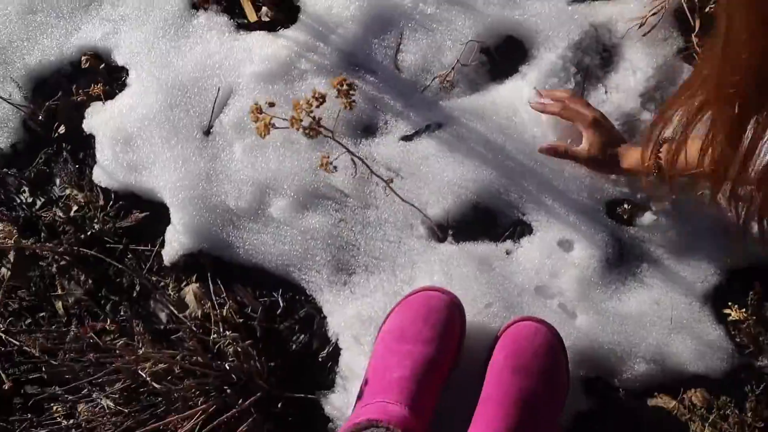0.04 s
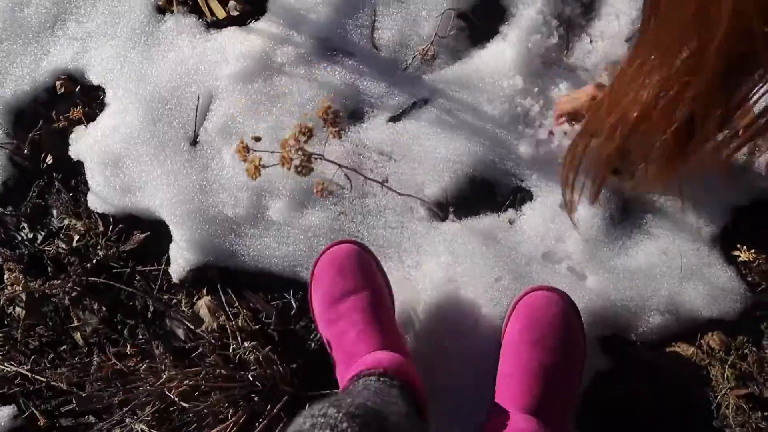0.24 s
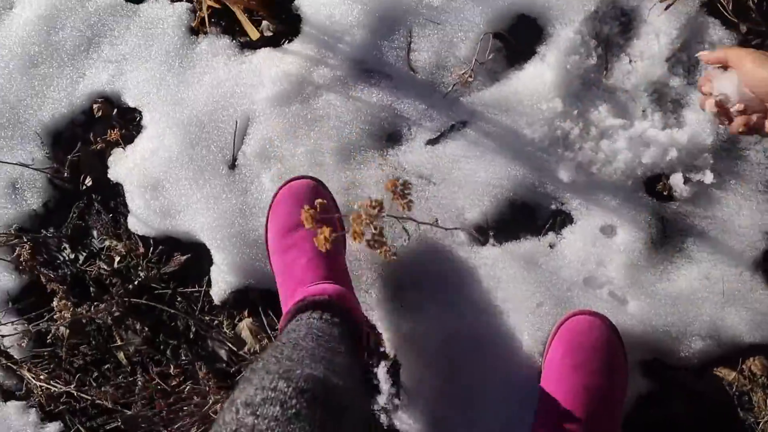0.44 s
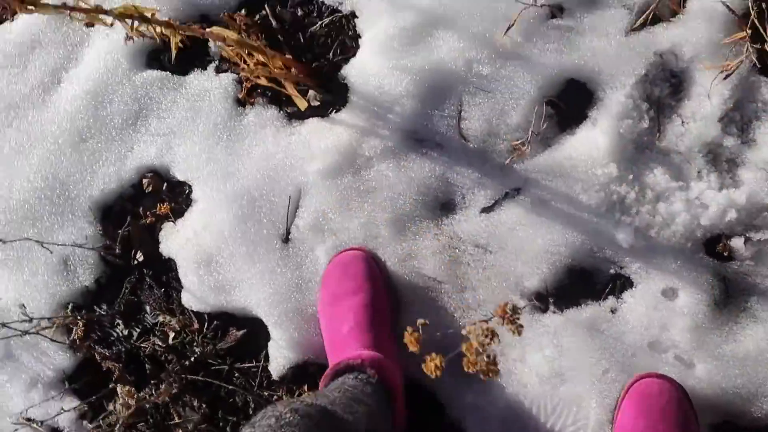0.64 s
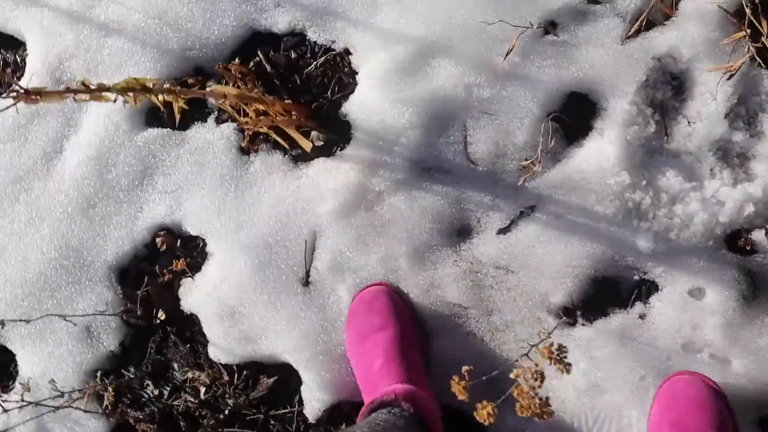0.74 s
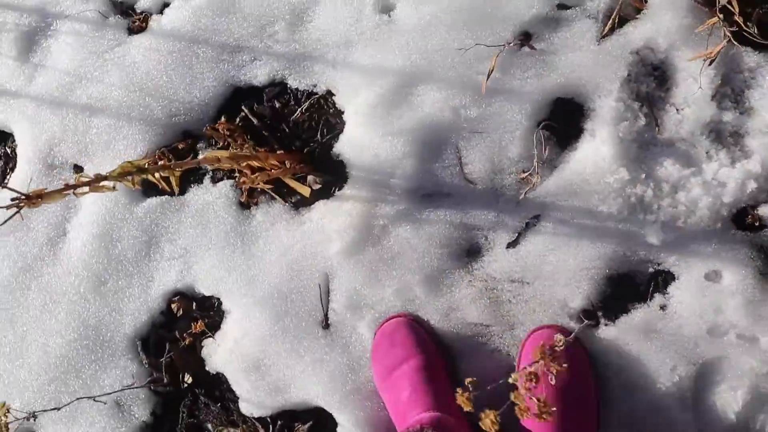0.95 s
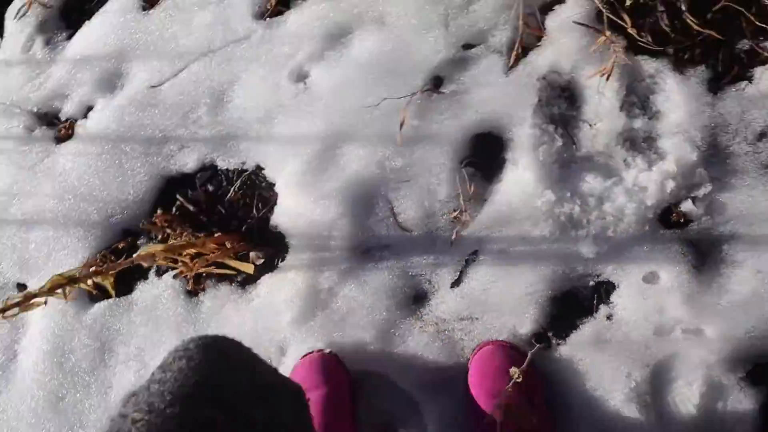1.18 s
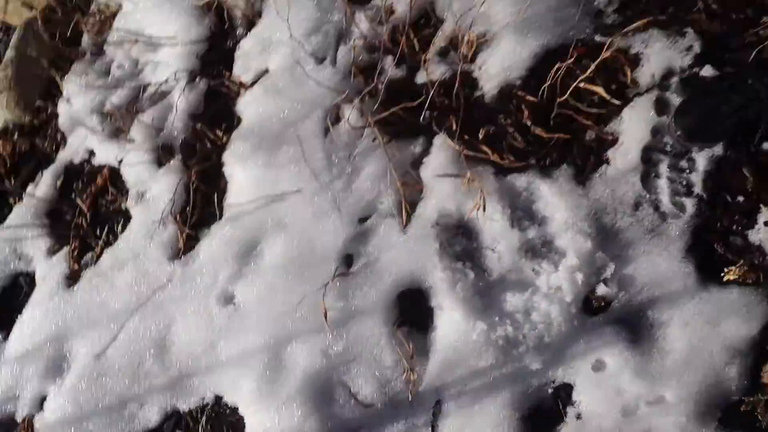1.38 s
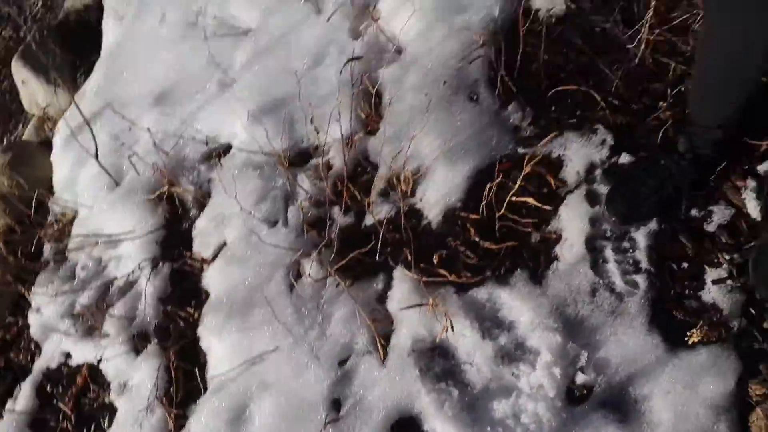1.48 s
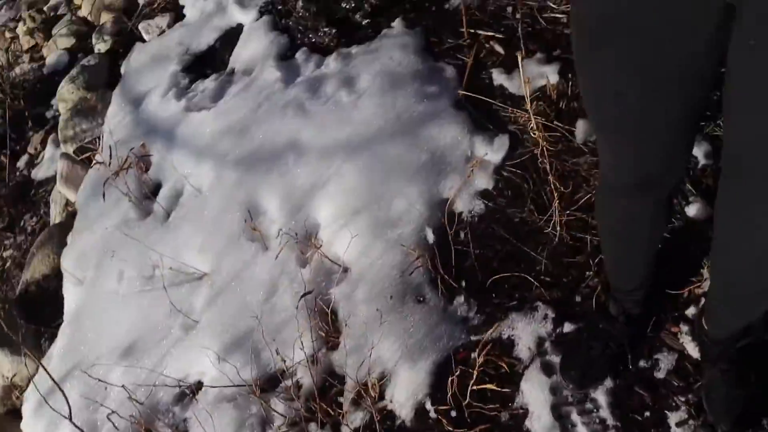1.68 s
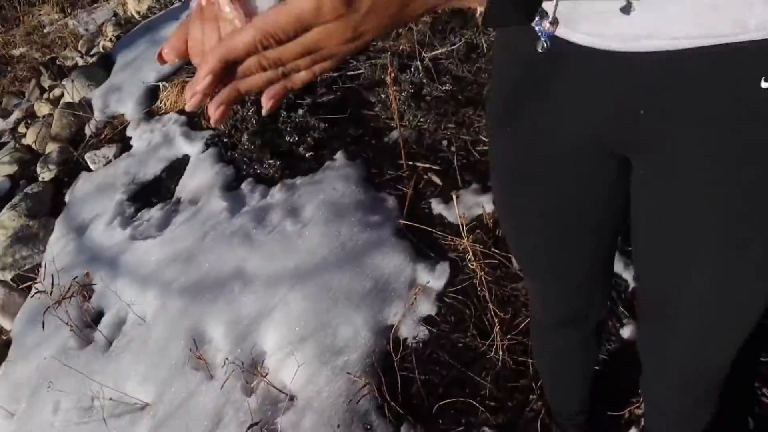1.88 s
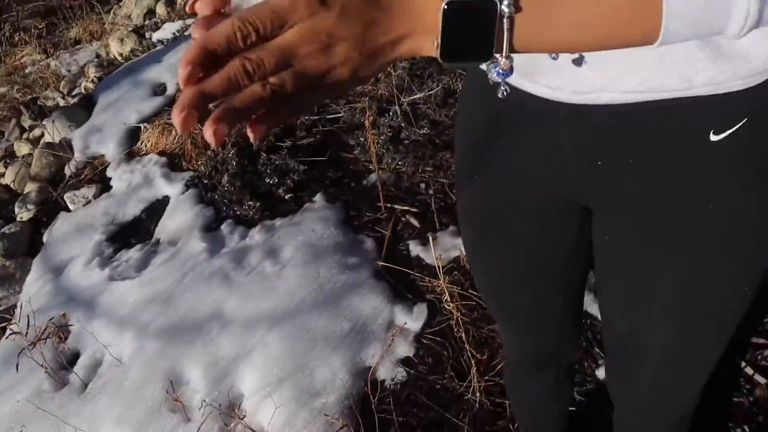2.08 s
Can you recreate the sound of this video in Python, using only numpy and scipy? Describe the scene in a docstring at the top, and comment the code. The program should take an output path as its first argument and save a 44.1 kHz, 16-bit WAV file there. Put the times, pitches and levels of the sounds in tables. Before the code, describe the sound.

Old crusty snow crunching in short bursts underfoot and by hand, with low wind rumble.

```python
"""Old crusty snow is scooped and trodden, close to a hand-held camera outdoors.
Each push crushes a swarm of ice grains: a hollow crunch and ringing chips from the crust,
a fizz from loose crystals. Pieces of crust snap, single crystals tick and a few sprinkle down.
Underneath, gusts buffet the microphone over a low outdoor rumble."""
import sys
import numpy as np
from scipy import signal
from scipy.fft import rfft, irfft
from scipy.io import wavfile

SR = 44100
rng = np.random.default_rng(int(sys.argv[2]) if len(sys.argv) > 2 else 0)


def inscribe(sig):
    """Save sig as 16-bit PCM at rate SR to the path in sys.argv[1].

    A 1-D sig is mono; a 2-D sig holds one channel per row.
    Samples are clipped to [-1, 1] before scaling.
    """
    pcm = np.round(np.clip(np.atleast_2d(sig).T, -1, 1) * 32767)
    wavfile.write(sys.argv[1], SR, pcm.astype(np.int16))


N = 93624
T, HZ = np.arange(N) / SR, np.fft.rfftfreq(N, 1 / SR) + 1e-3
SNOW_SHAPE, GUST_SHAPE = 1.46, 1.42  # swells: 1 = pointed, 2 = bell-shaped


def amp(db):
    """Decibels to gain."""
    return 10 ** (np.asarray(db) / 20)


def unit_rms(x):
    """Scales to rms 1."""
    return x / np.sqrt(np.mean(abs(x) ** 2) + 1e-20)


def curve(points, hz):
    """Reads a table on a log-frequency axis."""
    at, value = np.transpose(points)
    return np.interp(np.log(hz), np.log(at), value)


def colour(points, shift=1):
    """An EQ curve as gain per frequency, shifted in pitch, at unit power."""
    return unit_rms(amp(curve(points, HZ / shift)))


def resonance(hz, q):
    """A damped resonance at unit power."""
    return unit_rms(1 / (1 + 1j * q * (HZ / hz - hz / HZ)))


def crystal_ring(hz, q, top_hz=12600):
    """The ring of a small piece of ice, dulled at the very top."""
    return unit_rms(resonance(hz, q) / np.sqrt(1 + (HZ / top_hz) ** 20))


def swell(peak, rise, fall, shape):
    """An envelope that builds to a peak and dies away."""
    distance = abs(T - peak) / np.where(T < peak, rise, fall)
    return np.exp(-distance ** shape / np.sqrt(2))


def grains(per_s, scatter_db):
    """Random fractures as clicks: many small, a few large."""
    sizes = amp(scatter_db * np.minimum(rng.exponential(1, N), 4))
    return unit_rms(sizes * rng.choice([-1, 1], N) * (rng.random(N) < per_s / SR))


# How far the microphone pair pulls off-centre sounds apart (frequency [Hz], side over mid [dB])
STEREO_WIDTH = [(100, -66.5), (300, -41), (850, -12), (1700, -1.5), (4000, 2), (9000, 11), (14000, 10)]

def mic_pair(clicks, tone, side, spread):
    """Colours the clicks and gives each a direction scattered around side (- left, + right)."""
    width, mid = amp(curve(STEREO_WIDTH, HZ)), rfft(clicks)
    directions = side + spread * rng.standard_normal(N)
    apart = 1j * width * rfft(clicks * directions)
    tone = tone / np.sqrt(1 + width ** 2 * (side ** 2 + spread ** 2))  # width adds no power
    return irfft(np.array([mid - apart, mid + apart]) * tone, N)


# Tone of the outdoor bed (frequency [Hz], level [dB])
RUMBLE_EQ = [(20, -25), (50, -9), (90, 1), (200, -3), (265, -0.5), (305, 4), (370, -4.5), (650, -3.5),
             (1000, -14), (2000, -15.5), (5000, -20), (12000, -22.5), (15000, -35)]

def rumble(db=-41.5, width_db=4):
    """Steady distant outdoor noise from all sides."""
    return amp(db) * mic_pair(rng.standard_normal(N), colour(RUMBLE_EQ), side=0, spread=amp(width_db))


# Tone of a gust centred on GUST_EQ_HZ (frequency [Hz], level [dB])
GUST_EQ, GUST_EQ_HZ = [(15, -53), (35, -12), (65, -4), (115, -1.5), (180, -7), (280, -15.5), (450, -27.5),
                       (3000, -84)], 110
# Wind buffets (peak time [s], rise [s], fall [s], level [dB], centre [Hz], unevenness [0-1])
GUST_CUES = [(.015, 0.013, 0.025, -23.5, 95, 0.7), (0.071, 0.015, 0.018, -19.5, 86, 0.7),
             (.165, 0.045, 0.036, -24, 118, 0.82), (0.246, 0.046, 0.036, -18, 99.4, 0.54),
             (.34, 0.025, 0.074, -36, 126, 0.1), (.58, 0.072, .06, -43.5, 77, .02),
             (1.006, 0.056, 0.029, -30.5, 128, 0.07), (1.122, 0.0036, 0.01, -35, 131, 0.08),
             (1.86, 0.055, 0.026, -39.5, 93, 0.14), (1.955, 0.012, 0.014, -24.5, 191, 0.4),
             (2.02, 0.048, 0.026, -34.5, 127, 0.23), (2.073, 0.019, 0.017, -27.5, 161, 0.32),
             (2.118, 0.0053, 0.038, -22, 152, 0.06)]

def gust(peak, rise, fall, db, hz, uneven, small_eddy_hz=370, lean_db=1):
    """Large eddies push on both microphone ports alike, small ones differently."""
    both, apart = rfft(rng.standard_normal((2, N))) * colour(GUST_EQ, hz / GUST_EQ_HZ)
    apart = apart * uneven * np.minimum(HZ / small_eddy_hz, 1)
    lean = amp(lean_db * uneven * np.array([[-1], [1]]))  # uneven gusts press harder on the right
    eddies = irfft(np.array([both - apart, both + apart]), N) * lean
    force = swell(peak, rise, fall, GUST_SHAPE)
    return amp(db) * unit_rms(eddies * force) * np.sqrt(np.mean(force ** 2))


# Sprinkles of ice (peak time [s], rise [s], fall [s], level [dB], side [0 centre, + right])
SPRINKLE_CUES = [(.435, .05, 0.04, -45.5, 8.7), (.775, 0.059, 0.031, -45, 7.8),
                 (0.973, 0.011, 0.013, -33, 0.78)]

def sprinkle(peak, rise, fall, db, side):
    """Sparse loose crystals land on the crust with tiny, high ticks."""
    landings = swell(peak, rise, fall, SNOW_SHAPE) * grains(per_s=2400, scatter_db=1.5)
    return amp(db) * mic_pair(landings, crystal_ring(hz=11100, q=3.5), side, spread=0.67)


# Single crystals and stalks breaking (time [s], level [dB], pitch [Hz])
TICK_CUES = [(.1197, -35, 3000), (.1402, -16, 11500), (.4904, -38, 8870), (.7139, -32, 7000),
             (.7405, -20, 9200), (1.1254, -19, 6060), (1.2771, -21.5, 2880), (1.2796, -15.5, 5970),
             (1.519, -27, 3000), (1.6143, -24, 11600), (1.8787, -17.5, 11100), (1.996, -37.5, 6060)]

def tick(start, db, hz, decay_s=0.00078):
    """One brittle break with a very short rattle."""
    burst = (T >= start) * np.exp(-abs(T - start) / decay_s) * rng.standard_normal(N)
    gain = amp(db) * np.sqrt(decay_s * SR / N / 2)
    return gain * mic_pair(unit_rms(burst), crystal_ring(hz, q=1.5), side=0.92, spread=0.72)


# Weight and bite laid over a snap's ring (frequency [Hz], level [dB])
SNAP_EQ = [(300, 15.5), (700, 5.5), (2800, -3.5), (7000, 8), (14000, -17)]
# Pieces of crust snapping (time [s], length [s], level [dB], pitch [Hz])
SNAP_CUES = [(.04, 0.028, -35, 2400), (0.0587, 0.0033, -28, 1040), (0.366, 0.0047, -40.5, 1140),
             (0.387, 0.0021, -38, 1080), (0.486, 0.0024, -33.5, 1130), (.532, 0.0015, -32.5, 1220),
             (.592, 0.0014, -21.5, 790), (0.614, 0.004, -26.5, 855), (.6145, 0.0044, -32, 2200),
             (0.712, .0047, -29, 1030), (0.737, 0.0051, -30, 895), (1.279, 0.005, -40.5, 2820),
             (1.553, 0.0055, -31, 1360), (1.736, 0.0038, -36.5, 1680)]

def snap(start, length, db, hz):
    """A quick run of fractures knocks a hollow piece of crust, which rings briefly."""
    envelope = (T >= start) * np.exp(-((T - start) / length) ** 2 / 2)
    fractures = envelope * grains(per_s=4000, scatter_db=2.5)
    body = resonance(hz, q=3.5) * colour(SNAP_EQ)
    gain = amp(db) * np.sqrt(length * SR / N)
    return gain * unit_rms(mic_pair(fractures, body, side=0.39, spread=0.19))


def chips(peak, rise, fall, crunch_hz, count=26, scatter_octaves=0.614, decay_cycles=2.2):
    """Larger chips of crust break off during a push, each ringing a few cycles at its own pitch."""
    when, pitch, size = rng.standard_normal((count, 3)).T
    start = peak + np.clip(when, -1.6, 1.6) * np.where(when < 0, rise, fall)
    ring_hz = np.clip(crunch_hz * 1.304 * 2 ** (scatter_octaves * pitch), 400, 9000)
    cycles = ring_hz[:, None] * T[:512]
    gain = amp(np.clip(size, -2, 1.5) - 2 * when ** 2)  # loudest near the peak of the push
    rings = gain[:, None] * np.sin(2 * np.pi * cycles) * np.exp(-cycles / decay_cycles)
    at = np.round(abs(start) * SR).astype(int)[:, None] + np.arange(cycles.shape[1])
    return np.bincount(at.ravel(), rings.ravel(), N)[:N]


# Hollow body of a crunch centred on CRUNCH_EQ_HZ (frequency [Hz], level [dB])
CRUNCH_EQ, CRUNCH_EQ_HZ = [(120, -2), (300, -4), (600, 1), (1400, -2), (2200, -2.5), (3500, -5.5),
                           (6000, -5), (10000, -24), (14000, -50)], 1000
# Bright fizz of loose crystals (frequency [Hz], level [dB])
FIZZ_EQ = [(400, -41), (1500, -18), (3000, -4), (5000, -3), (7500, 1.5), (10500, 4.5), (12200, 3.5),
           (13500, -11), (15500, -49)]
# Pushes into the snow (peak time [s], rise [s], fall [s], crunch level [dB], crunch centre [Hz],
# fizz level [dB], side [-1 left to 1 right], spread [0-1])
PUSH_CUES = [(.01, 0.05, 0.038, -36.5, 2070, -36.5, 1, 0.6), (0.059, 0.014, .014, -28.5, 1580, -43, 1, 0.5),
             (.135, 0.093, 0.033, -46, 1480, -35.5, .1, 0.58),
             (0.172, .009, .013, -38.5, 1850, -48, 0.65, 0.5),
             (0.239, 0.053, 0.058, -45, 1640, -29.5, 0.039, .55),
             (0.438, 0.099, 0.13, -50, 1180, -73, 0.59, 0.4),
             (0.534, 0.0092, 0.0073, -63, 1200, -38, 1, 0.7),
             (.612, 0.022, 0.0072, -35, 1170, -30.5, 0.016, 0.46),
             (.67, .045, .026, -32.5, 1113, -32.5, -0.38, 0.57),
             (0.744, 0.023, 0.064, -41, 1440, -70, 0.82, 0.77),
             (1.062, 0.012, .028, -20.5, 1360, -25.5, 0.56, 0.44),
             (1.15, 0.016, 0.065, -36, 1180, -36.5, -0.26, 0.48),
             (1.42, 0.046, .023, -38, 1050, -37, 0.087, 0.54),
             (1.47, .019, 0.025, -37.5, 1040, -42.5, 0.28, 0.53),
             (1.556, 0.0035, 0.02, -37, 1290, -54, -0.36, 0.3),
             (1.585, 0.053, 0.0061, -40.5, 1430, -38, 0.04, 0.18),
             (1.633, 0.029, 0.024, -37, 1190, -38.5, 0.044, 0.54),
             (1.658, .003, 0.0068, -46, 1400, -37, 0, 0),
             (1.677, 0.0076, 0.038, -45.5, 1410, -34.5, .2, 0.3),
             (1.771, 0.037, 0.052, -40, 1680, -33, 0, 0.42),
             (1.86, 0.019, .025, -34.5, 1070, -36, -0.74, 0.38),
             (1.916, 0.023, 0.032, -36, 790, -48, 0.71, 0.57)]

def push(peak, rise, fall, crunch_db, hz, fizz_db, side, spread, chip_db=2, clump_db=3, clump_s=0.012):
    """Crust crumbles in coarse grains and chips while loose crystals spill in fizzing clumps."""
    force = swell(peak, rise, fall, SNOW_SHAPE)
    coarse = force * grains(per_s=4500, scatter_db=2)
    crunch = mic_pair(coarse, colour(CRUNCH_EQ, hz / CRUNCH_EQ_HZ), side, spread)
    clump_sizes = np.clip(rng.standard_normal(N), -2, 2)
    clumps = amp(clump_db * np.interp(T / clump_s, np.arange(N), clump_sizes))
    fine = force * clumps * grains(per_s=11000, scatter_db=1.5)
    fizz = mic_pair(fine, colour(FIZZ_EQ), side, spread)
    low_cut = HZ / np.hypot(HZ, hz / 2)
    ringing = mic_pair(chips(peak, rise, fall, hz), low_cut, side, spread=0)
    return amp(crunch_db) * (crunch + amp(chip_db) * ringing) + amp(fizz_db) * fizz


# Stereo balance of all the snow (frequency [Hz], left boost and right cut [dB])
SNOW_BALANCE = [(400, -.5), (1100, 0.1), (3500, -0.66), (10000, -0.6)]

def scene():
    """Mixes the close snow over the wind and the outdoor bed."""
    snow = sum(push(*cue) for cue in PUSH_CUES)
    snow += sum(snap(*cue) for cue in SNAP_CUES)
    snow += sum(tick(*cue) for cue in TICK_CUES)
    snow += sum(sprinkle(*cue) for cue in SPRINKLE_CUES)
    balance = amp(np.outer([1, -1], curve(SNOW_BALANCE, HZ)))
    snow = irfft(rfft(snow) * balance, N)
    return snow + sum(gust(*cue) for cue in GUST_CUES) + rumble()


def record(dry, low_cut_hz=31, top_hz=15700):
    """The recorder's low cut and band limit."""
    low_cut = signal.butter(3, low_cut_hz, "high", fs=SR, output="sos")
    band_limit = signal.firwin(511, top_hz, window=("kaiser", 9), fs=SR)
    return signal.oaconvolve(signal.sosfilt(low_cut, dry), band_limit[None], "same")


dry = scene()
out = record(dry)
inscribe(out)
```